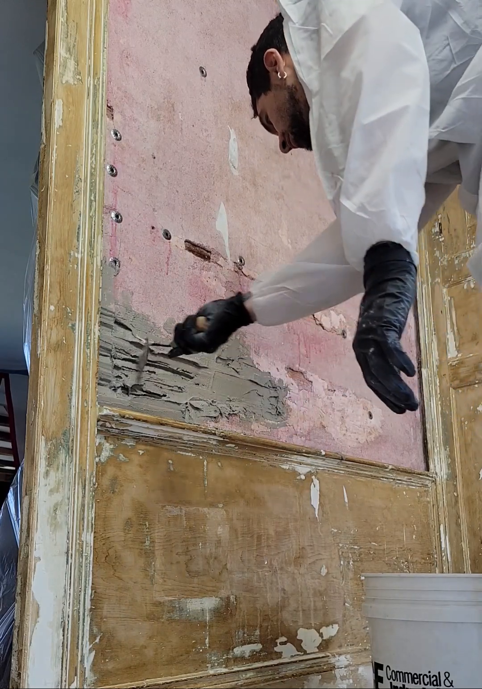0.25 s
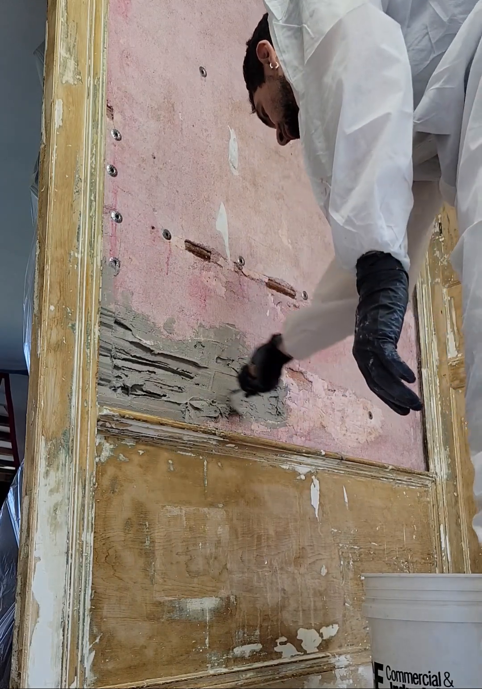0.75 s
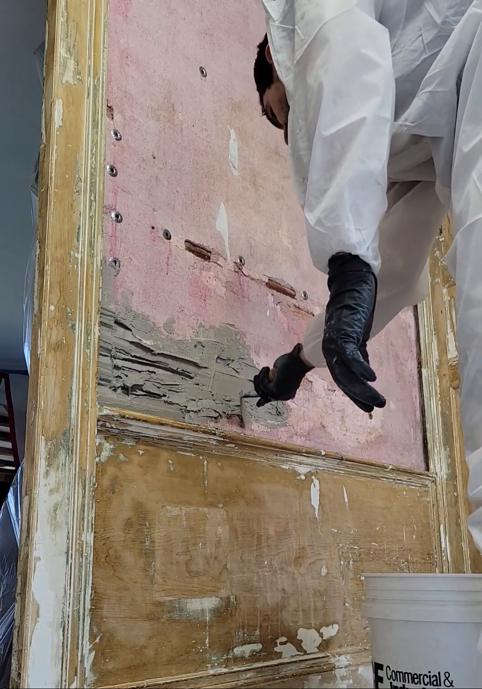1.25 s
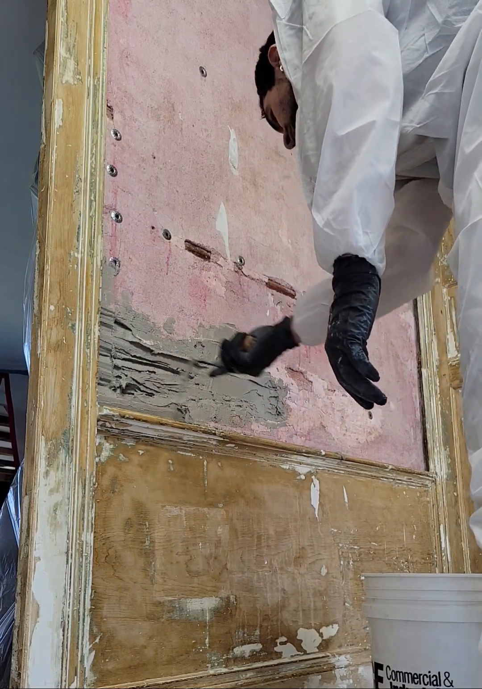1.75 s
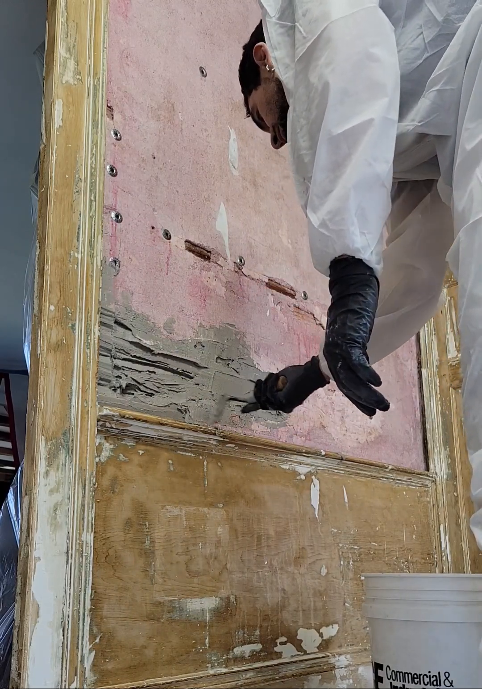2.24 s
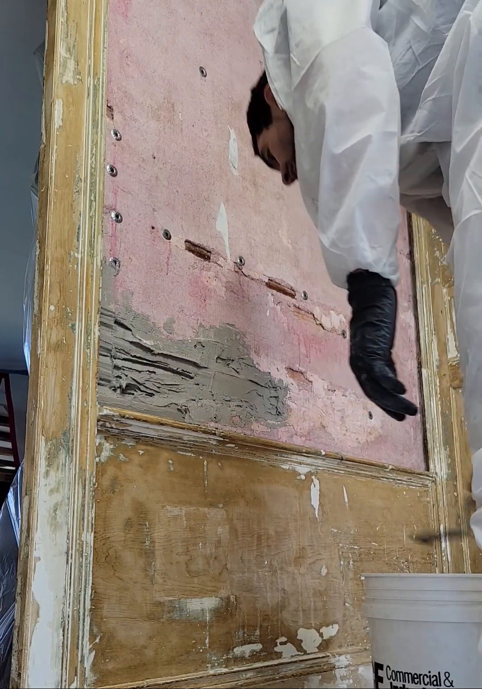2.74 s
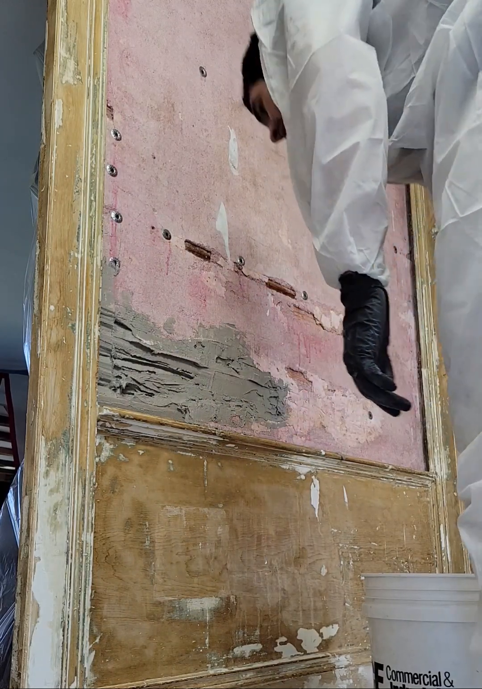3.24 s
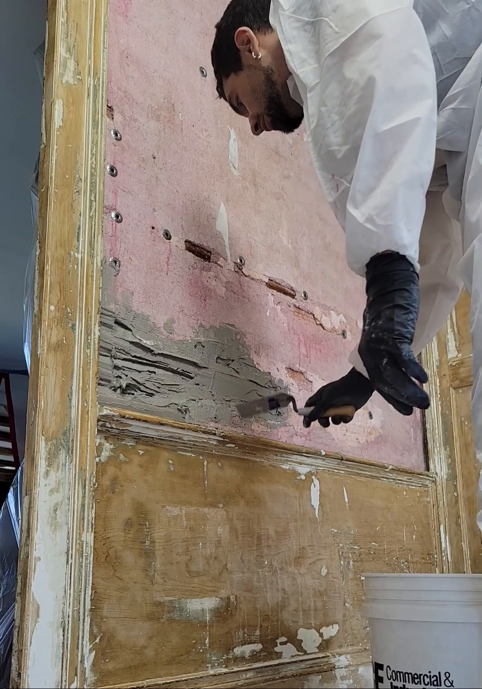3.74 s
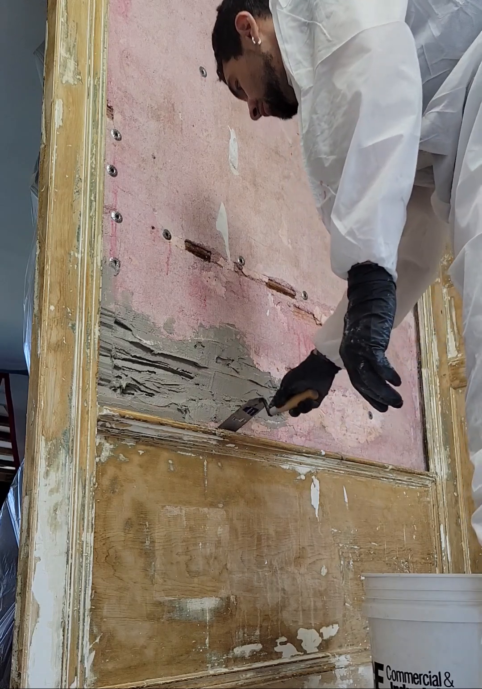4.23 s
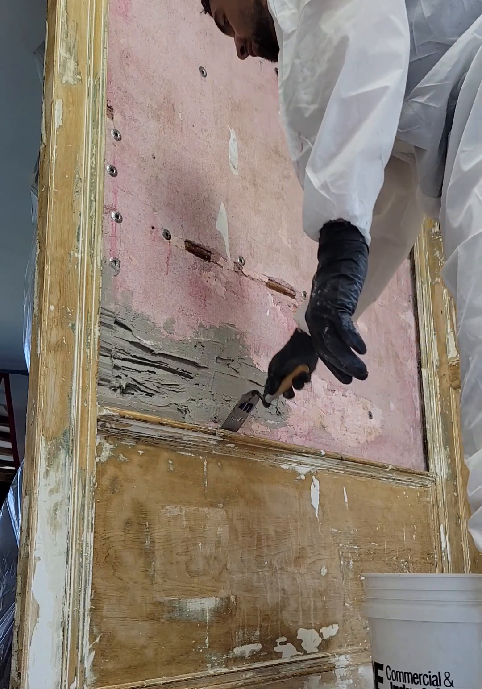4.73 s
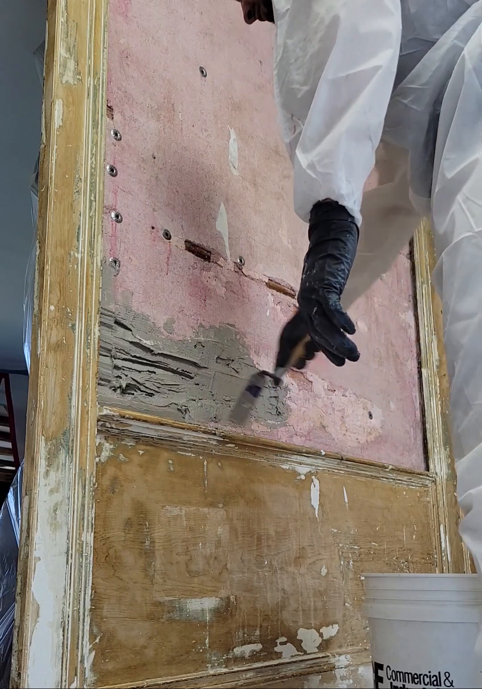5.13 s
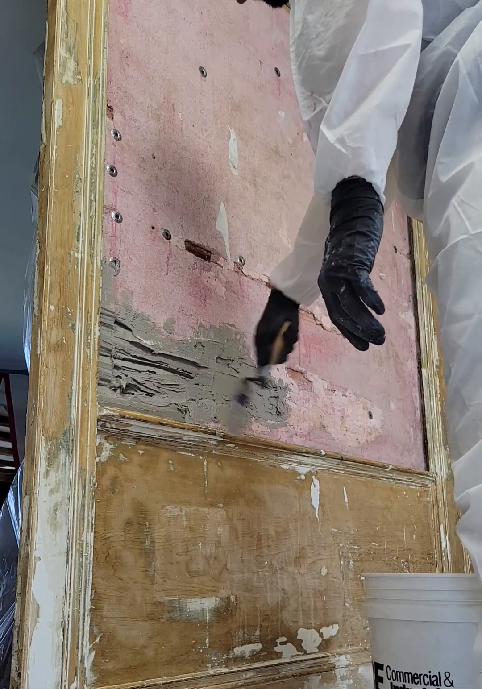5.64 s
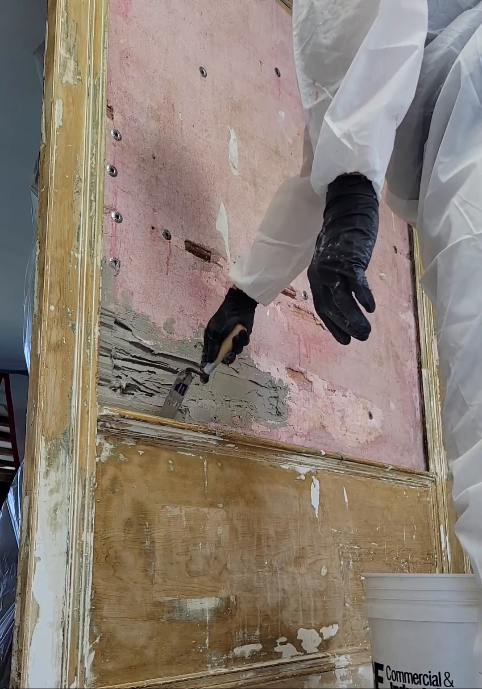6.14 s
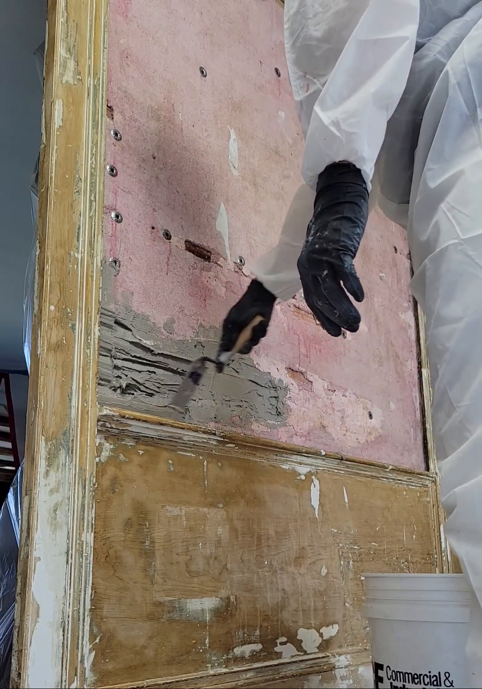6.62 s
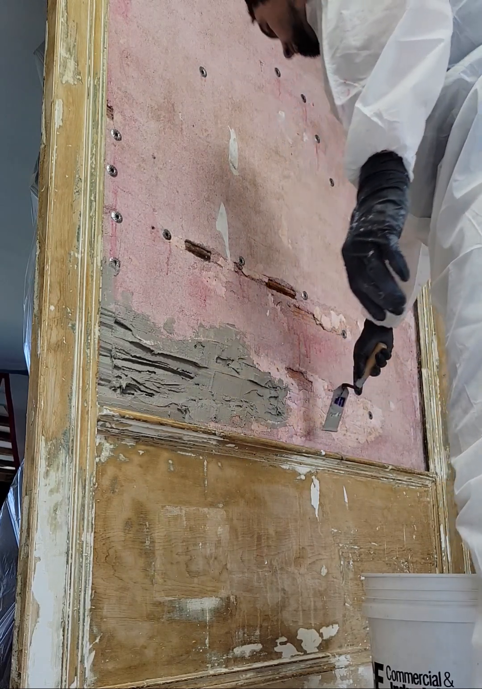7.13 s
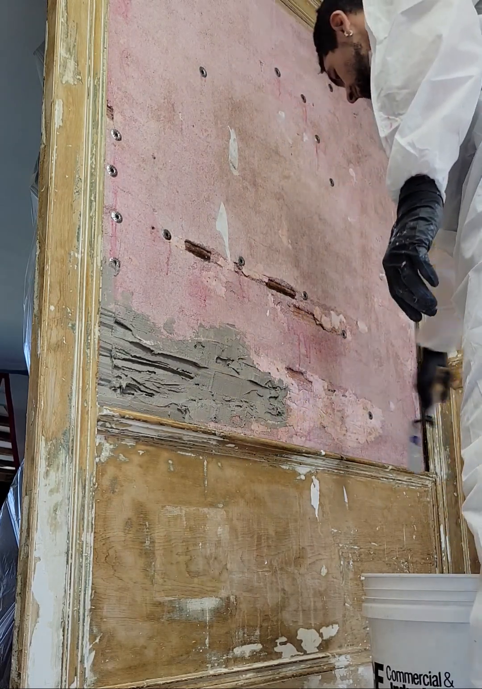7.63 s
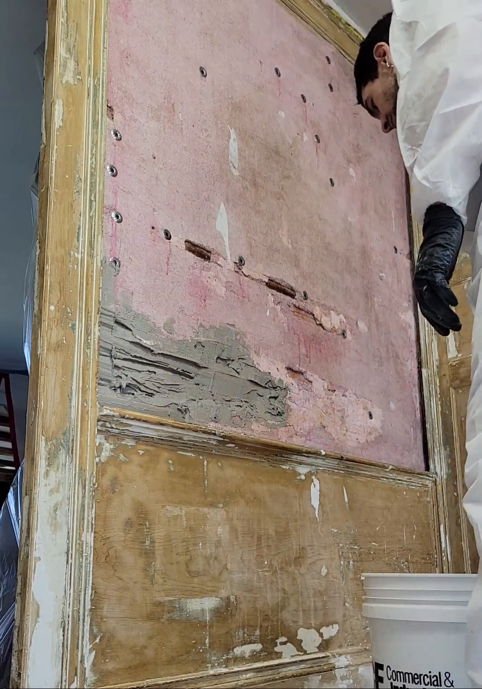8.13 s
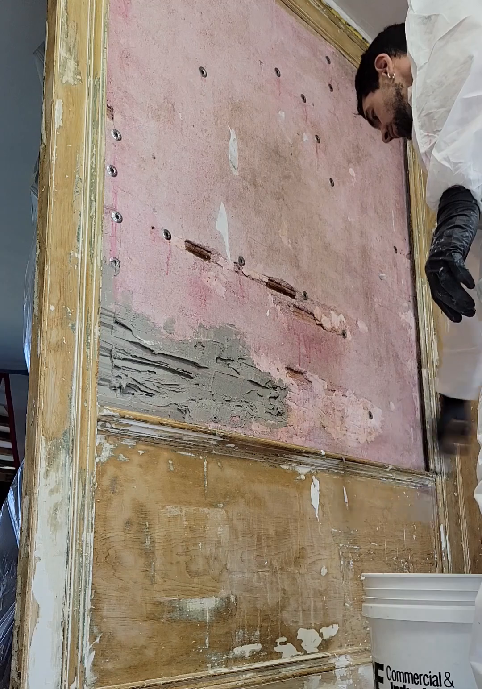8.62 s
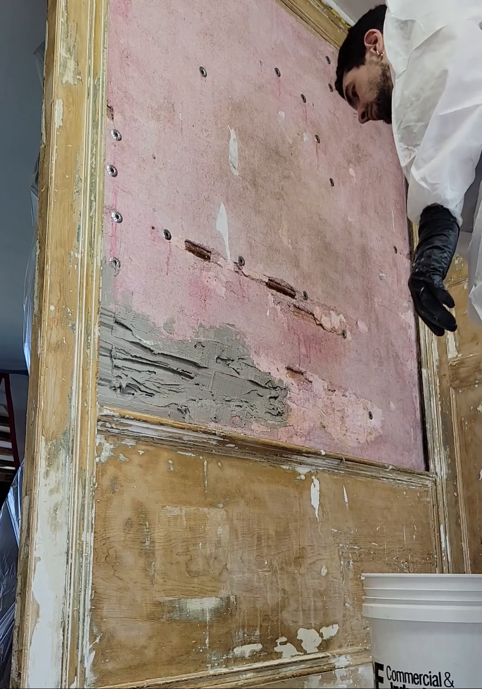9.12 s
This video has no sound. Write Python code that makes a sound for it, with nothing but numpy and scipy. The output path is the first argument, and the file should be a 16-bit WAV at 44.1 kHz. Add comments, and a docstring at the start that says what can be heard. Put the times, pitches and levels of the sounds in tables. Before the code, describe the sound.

Brief sandy trowel scrapes on a plastered wall, broken by dull wooden knocks and faint clothing rustle in an empty room.

```python
"""Plastering over lath

A bare room in an old house, the stereo microphone far enough off to hear more room than direct scrape.
A steel trowel spreads sandy plaster over wooden lath in short strokes: the hand bears down, eases and
lifts, and sand grains catch under the blade, shaking the steel and the hollow wall. The tool knocks as
it lands and is reloaded. Between strokes a coverall rustles, over a faint mains hum."""
import sys
import numpy as np
from scipy import signal
from scipy.fft import rfft, irfft, next_fast_len
from scipy.io import wavfile

SR = 44100
rng = np.random.default_rng(int(sys.argv[2]) if len(sys.argv) > 2 else 0)


def int16_out(signal):
    """Quantize to a 16-bit WAV file."""
    q = np.round(np.clip(np.atleast_2d(signal).T, -1, 1) * 32767)
    wavfile.write(sys.argv[1], SR, q.astype(np.int16))


N = 413216
TIME = np.arange(N) / SR
LIFT_S, FLEX_RELEASE_S = 0.0065, 0.06  # decay times as the blade lifts and as the lath settles

# Strokes of the blade; mortar and hand pressure shift its two bending modes. Levels marked rel are
# relative to the grit: start_s, bear_s, ease_s, peak_grit_db, swell_db, blade_rel_db, wall_rel_db,
# fizz_rel_db, flex_rel_db, low_mode_lift_db, high_mode_hz, high_mode_lift_db
STROKES = [ (0.0, 0.13, 0.13, -35, 9.5, 2.5, -3.5, -15, -25.5, 1, 1540, -2.5),
           (0.673, 0.19, 0.0085, -17, 20.5, 1, -9.5, -15, -40, 4.5, 1481, 1),
           (1.34, 0.057, 0.0092, -44, 6, -1.5, 1, -16, -20, -7, 1530, 1),
           (1.39, 0.11, 0.039, -26.5, 7, 0.5, -9, -15, -28, 1.5, 1482, 3.5),
           (2.255, 0.017, 0.04, -49.5, 0.5, 13, 5, -12.5, -21.5, 16.5, 1330, 4.5),
           (4.858, 0.052, 0.021, -26.5, 14.5, 3.5, -6, -14.5, -14.5, 4.5, 1620, 5),
           (5.589, 0.076, 0.013, -27.5, 17, 4.5, -5.5, -13, -14.5, 8, 1354, 4.5),
           (6.278, 0.13, 0.061, -33, 22.5, 2.5, -6, -11, -14.5, 13.5, 1324, 5.5),
           (6.718, 0.016, 0.059, -51.5, -5.5, 5.5, 6, -16, -5, 7, 1500, -6),
           (6.793, 0.1, 0.018, -30.5, 11.5, 3.5, -9, -12, -21, 9, 1456, 5),
           (7.511, 0.026, 0.065, -34, -1, 4, 2, -14, -13, 4.5, 1380, -6),
           (8.572, 0.032, 0.018, -34.5, 11.5, 1, -1.5, -12, -11.5, 13, 1340, 1.5), ]
# Resonances of the steel blade: pitch_hz, width_hz, lift_db
STEEL_MODES = [(1030, 43, 1), (1566, 18, -4), (1680, 89, 5.5), (2108, 82, 7.5), (2850, 30, 5),
               (3000, 15, 5.5), (3045, 9.5, 3), (3060, 12, 3.5), (4160, 31, 5), (5500, 16, -0.5)]
# Spectrum of lath giving under the hand: frequency_hz, level_db
FLEX_SPECTRUM = [(25, -26), (45, -5), (80, 4.5), (110, -1.5), (170, -17.5), (400, -53.5)]


def amp(db):
    """Decibels to gain."""
    return 10 ** (np.asarray(db) / 20)


def unit_rms(x):
    """Scales to rms 1."""
    return x / np.sqrt(np.mean(x ** 2) + 1e-20)


def curve_at(points, hz):
    """Reads a table on a log-frequency axis."""
    point_hz, value = np.transpose(points)
    return np.interp(np.log(hz + 1), np.log(point_hz + 1), value)


def add(track, start_s, sound):
    """Mixes a sound into a track, in place."""
    part = track[max(round(start_s * SR), 0):][:len(sound)]
    part += sound[:len(part)]


def colour(x, spectrum, peaks=(), size=8192):
    """Causal filter of unit power, from a smooth spectrum lifted by resonances."""
    hz = np.fft.rfftfreq(size, 1 / SR)
    peaks_db = sum(lift / (1 + (2 * (hz - centre) / width) ** 2) for centre, width, lift in peaks)
    gain = unit_rms(amp(curve_at(spectrum, hz) + peaks_db))
    cepstrum = irfft(np.log(gain))
    cepstrum[1:size // 2] *= 2  # fold to minimum phase
    cepstrum[size // 2 + 1:] = 0
    return signal.oaconvolve(x, irfft(np.exp(rfft(cepstrum))))[:N]


def contact(level_db, release_s, press_s=0.0086):
    """Gain along a gesture: presses on, follows the level, then lets go."""
    tail = amp(level_db[-1]) * np.exp(-np.arange(0, 8 * release_s, 1 / SR) / release_s)
    gain = np.concatenate([amp(level_db), tail])
    return gain * (1 - np.exp(-np.arange(len(gain)) / SR / press_s))


def grains(per_s, spread_db, judder_db, judder_hz):
    """Tiny impacts of uneven size, bunched by stick and slip."""
    clicks = rng.standard_normal(N) * (rng.random(N) < per_s / SR)
    sizes_db = spread_db * np.minimum(rng.exponential(1, N), 4)
    lowpass = signal.butter(2, judder_hz, fs=SR, output="sos")
    slips = unit_rms(signal.sosfilt(lowpass, rng.standard_normal(N)))
    return unit_rms(clicks * amp(sizes_db + judder_db * slips))


def burst(decay_s, rise_s=0.0025, size=8192):
    """A crunch of noise that starts fast and dies away."""
    t = np.arange(size) / SR
    return rng.standard_normal(size) * (1 - np.exp(-t / rise_s)) * np.exp(-t / decay_s)


def room_tone(air_db=-70.5, hum_hz=119.5, hum_db=-64.5):
    """Still room air and a mains hum, as mid and side."""
    # Spectrum of the air: frequency_hz, level_db
    air_spectrum = [(25, -20.5), (50, -4.5), (100, 1), (170, -10), (300, -13), (700, -17), (1600, -22.5),
                    (3000, -24.5), (6500, -26.5), (8300, -50.5), (13000, -37), (15500, -47)]
    air = np.array([colour(rng.standard_normal(N), air_spectrum) for _ in range(2)])
    hum = np.sqrt(2) * np.sin(2 * np.pi * hum_hz * TIME)
    return amp(air_db) * air + amp(hum_db) * hum


def room_response(direct_db=-4, early_db=-5, early_t60_s=0.06, build_up_s=0.0067):
    """Paths to the microphone, as mid and side: direct sound, close reflections and the room's tail."""
    # Reverberation of the bare room: frequency_hz, t60_s
    decay_times = [(60, 0.35), (160, 0.35), (420, 0.61), (1100, .55), (2900, 0.48), (7000, 0.41),
                   (14000, 0.28)]
    t = np.arange(SR) / SR
    hz, frame_s, noise = signal.stft(rng.standard_normal((2, SR)), SR, nperseg=256)
    fade = amp(-60 * frame_s / curve_at(decay_times, hz)[:, None])
    tail = signal.istft(noise * fade, SR, nperseg=256)[1][:, :SR]
    tail *= 1 - np.exp(-t / build_up_s)
    echoes = rng.choice([-1, 1], (2, SR)) * (rng.random((2, SR)) < 2500 / SR)  # about 2500 a second
    early = echoes * amp(-60 * t / early_t60_s)
    paths = tail / np.linalg.norm(tail[0]) + amp(early_db) * early / np.linalg.norm(early[0])
    paths[0, 0] += amp(direct_db)
    return paths / np.linalg.norm(paths, axis=1, keepdims=True)


def room(x, places=3, travel_hz=2.3):
    """The reflections keep changing as the hand travels along the wall."""
    mid_side = np.zeros((2, N))
    for place in range(places):
        share = np.sqrt(2 / places) * abs(np.cos(np.pi * (travel_hz * TIME + place / places)))
        mid_side += signal.fftconvolve((x * share)[None], room_response(), axes=1)[:, :N]
    return mid_side


def rustle(trim_db=-1, sag_db=4):
    """Cloth crinkles and wet mortar rubs: each movement starts briskly and slows."""
    # Moves of the arm, and of the trowel in the mortar tub: start_s, length_s, cloth_db, rub_rel_db
    movements = [(2.537, 0.53, -75.5, 3.5), (2.932, 0.23, -49.5, 4), (3.09, 0.15, -51, 0),
                 (3.986, 0.032, -63.5, -4.5), (5.962, 0.074, -56.5, -37), (7.846, 0.083, -55.5, -5),
                 (7.956, 0.024, -43.5, -13), (8.201, 0.11, -54.5, -6.5), (8.342, 0.11, -57.5, -40),
                 (8.73, 0.11, -49, -32), (8.96, 0.23, -70.5, 1.5), (9.163, 0.16, -62.5, -9)]
    # Spectrum of the coverall: frequency_hz, level_db
    cloth_spectrum = [(100, -3), (300, -2.5), (700, -5.5), (1500, -4.5), (3000, 1.5), (6500, -2.5),
                      (8300, -23.5), (13000, -19), (16000, -23.5)]
    # Spectrum of steel drawn through wet mortar: frequency_hz, level_db
    rub_spectrum = [(200, -13.5), (600, -3), (1100, -3), (1600, -4), (2300, -4.5), (5000, -33)]
    cloth, rub = np.zeros((2, N))
    for start_s, length_s, cloth_db, rub_rel_db in movements:
        slowing_db = np.linspace(0, sag_db, round(length_s * SR))
        motion = contact(cloth_db + trim_db - slowing_db, release_s=0.073, press_s=0.014)
        add(cloth, start_s, motion)
        add(rub, start_s, amp(rub_rel_db) * motion)
    crinkle = grains(per_s=3600, spread_db=3, judder_db=1.5, judder_hz=51.36)
    return colour(cloth * crinkle, cloth_spectrum) + colour(rub * crinkle, rub_spectrum)


def knocks(ring_db=-6, push_db=-1, reach_octaves=0.97, rise_s=0.0066):
    """Each blow is a low push that rings the wood modes near its pitch and rattles and flexes the lath."""
    # Dull blows of the trowel on wood and mortar:
    # start_s, level_db, pitch_hz, clatter_rel_db, clatter_decay_s, flex_rel_db
    blows = [ (2.29, -42, 720, 6, 0.012, -28), (2.852, -12, 235, -13.5, 0.048, -14),
             (3.123, -28.5, 267, -1.5, 0.041, -10.5), (3.145, -17.5, 113.4, -17, 0.026, -13),
             (4.217, -41, 388, -18, 0.0061, -37), (4.456, -26, 269, -7, 0.037, -11),
             (5.431, -33.5, 310, -9, 0.018, -23.5), (6.186, -54.5, 150, -17, .008, -13),
             (6.773, -38, 325, -1.5, .012, -9), (7.432, -29, 342, -4, 0.018, -21),
             (7.463, -25.5, 341, 4, 0.0078, -40), (8.546, -40, 267, -10, 0.018, -9),
             (9.217, -55.5, 280, 17, .004, -1), ]
    # Modes of the hollow woodwork: pitch_hz, level_db, t60_s
    wood_modes = [(83.1, -9.5, 0.4), (111.2, -7.5, 0.063), (154, -6, 0.25), (182.8, -0.5, 0.24),
                  (226, 3, 0.15), (267.1, 1, 0.21), (326, -1.5, 0.27), (378, -2.5, 0.16), (481, -4, 0.19),
                  (673, -6.5, .07)]
    # Spectrum of loose lath rattling: frequency_hz, level_db
    clatter_spectrum = [(25, -46), (50, -22), (90, -9), (180, -12.5), (300, 6), (700, 0.5), (1400, -5.5),
                        (2500, -13), (6000, -51.5)]
    t = np.arange(SR // 2) / SR
    mode_hz, mode_db, t60_s = np.transpose(wood_modes)[:, :, None]
    envelopes = amp(mode_db - 60 * t / t60_s) * (1 - np.exp(-t / rise_s))
    modes = envelopes * np.sin(2 * np.pi * mode_hz * t)
    thud, clatter, flex = np.zeros((3, N))
    for start_s, level_db, pitch_hz, clatter_rel_db, clatter_decay_s, flex_rel_db in blows:
        reach = 1 / (1 + (np.log2(mode_hz / pitch_hz) / reach_octaves) ** 4)
        ring = amp(ring_db) * (reach * modes).sum(0)
        cycles = pitch_hz * t
        push = amp(push_db) * cycles * np.exp(1 - cycles) * np.sin(2 * np.pi * cycles)
        add(thud, start_s, amp(level_db) * (push + ring))
        add(clatter, start_s, amp(level_db + clatter_rel_db) * burst(clatter_decay_s))
        add(flex, start_s, amp(level_db + flex_rel_db) * burst(FLEX_RELEASE_S))
    return thud + colour(clatter, clatter_spectrum) + colour(flex, FLEX_SPECTRUM)


def blade_ring(pitch_hz=2960, width_hz=140, decay_s=0.054):
    """Off the wall, the steel's strongest cluster of modes dies away with a rough, beating ring."""
    # The blade springs clear of the mortar: start_s, level_db
    releases = [(0.879, -37), (4.445, -52), (4.919, -41.5), (8.604, -53)]
    drive = np.zeros(N)
    for start_s, level_db in releases:
        add(drive, start_s, amp(level_db) * burst(decay_s, size=SR // 2))
    b, a = signal.iirpeak(pitch_hz, pitch_hz / width_hz, fs=SR)
    make_up_gain = np.sqrt(SR / width_hz / 2)
    return make_up_gain * signal.lfilter(b, a, signal.lfilter(b, a, drive))


def blade_rasp(drive, low_db, high_hz, high_db, low_hz=740, width_hz=280, reference_hz=1600):
    """The blade rasps through two broad bending modes; load lowers the upper one and the whole colour."""
    # Spectrum of the blade with its upper mode at reference_hz: frequency_hz, level_db
    blade_spectrum = [(200, -24), (450, 3), (700, -1.5), (1100, 0), (1600, 6), (2100, 6), (3000, -11.5),
                      (6000, -39)]
    shifted = np.array(blade_spectrum) * [high_hz / reference_hz, 1]
    bending_modes = [(low_hz, width_hz, low_db), (high_hz, width_hz, high_db)]
    return colour(drive, shifted, list(STEEL_MODES) + bending_modes)


def blade_bending(drive):
    """Each stroke loads the blade in its own way; between strokes it is free."""
    loaded, free = np.zeros(N), drive.copy()
    for start_s, bear_s, ease_s, *_, low_db, high_hz, high_db in STROKES:
        end_s = start_s + bear_s + ease_s + 2 * LIFT_S
        span = slice(round(start_s * SR), round(end_s * SR))
        add(loaded, start_s, blade_rasp(drive[span], low_db, high_hz, high_db))
        free[span] = 0
    return loaded + blade_rasp(free, low_db=2, high_hz=1420, high_db=4)


def hand_pressure(bear_s, ease_s, swell_db, ease_db=9):
    """Force through one stroke, in dB from its peak: the hand bears down, then eases off."""
    t = np.arange(0, bear_s + ease_s, 1 / SR)
    bearing = np.maximum(1 - t / bear_s, 0) ** 1.21  # fast at first, flattening towards the peak
    easing = np.maximum(t - bear_s, 0) / ease_s
    return -swell_db * bearing - ease_db * easing


def trowel_scrape(stroke_trim_db=-2, snag_trim_db=3, wall_follow=0.61, fizz_follow=1.2, flex_follow=0.7):
    """One stream of sand impacts hisses, rings the blade, drums on the wall and shakes the lath."""
    # The edge touches down or snags on a coarse grain: start_s, grit_db, blade_rel_db, fizz_rel_db
    snags = [ (0.076, -17.5, -25, -19.5), (0.124, -22, -19, -34), (0.165, -21, -15.5, -42),
             (0.6728, -31, 1.5, -36), (0.8753, -8, -19.5, -30.5), (1.2942, -50, 7, -41),
             (1.4, -15.5, -8.5, -18), (2.8496, -20.5, -0.5, -35), (3.1199, -20.5, 1, -20),
             (4.2072, -55, -2, -13.5), (4.4456, -25.5, -2.5, -13), (4.6624, -50, 3.5, -10.5),
             (4.9132, -17, -18, -30), (5.4351, -50.5, 3, -23), (5.588, -36, 7, -14),
             (5.6227, -29, -11, -24), (5.6475, -28, 4, -22), (5.66, -18, 2, -12), (5.973, -43, -4.5, -4.5),
             (6.1791, -39, -2, -20), (6.3683, -23.5, 2, -14), (6.3914, -26.5, 8.5, -8),
             (6.4445, -33, 1, -5), (6.825, -24.5, -6, -12), (6.87, -21, 3, -11), (7.4618, -30, 9, -29),
             (7.5664, -20.5, -26, -32), (7.868, -45, -4, -26), (8.4157, -41.5, -13, -13),
             (8.604, -25, -3.5, -15), (8.7026, -37.5, -3.5, -12), (9.219, -50.5, 8.5, -28), ]
    # Spectrum of sand under the steel: frequency_hz, level_db
    grit_spectrum = [(500, -29.5), (1600, 1), (2600, 6.5), (4000, 0.5), (5500, -1.5), (6700, -7),
                     (7500, -20), (8400, -24), (16000, -38.5)]
    # Spectrum of the hollow wall: frequency_hz, level_db
    wall_spectrum = [(25, -39.5), (50, -26.5), (90, -24), (130, -8.5), (180, 6.5), (320, 8), (480, 5.5),
                     (700, -21), (2000, -51.5)]
    # Spectrum of the bare edge fizzing: frequency_hz, level_db
    fizz_spectrum = [(3000, -46), (7000, 4.5), (8500, -2.5), (10500, 3), (13000, 6), (15500, 3.5)]
    drives = np.zeros((5, N))
    grit_drive, blade_drive, wall_drive, fizz_drive, flex_drive = drives
    for start_s, bear_s, ease_s, peak_db, swell_db, blade_rel, wall_rel, fizz_rel, flex_rel, *_ in STROKES:
        level_db = peak_db + stroke_trim_db
        force_db = hand_pressure(bear_s, ease_s, swell_db)
        freeing_db = np.linspace(-0.25, 0.25, len(force_db))  # the blade rings more as mortar runs out
        add(grit_drive, start_s, contact(level_db + force_db, LIFT_S))
        add(blade_drive, start_s, contact(level_db + blade_rel + force_db + freeing_db, LIFT_S))
        add(wall_drive, start_s, contact(level_db + wall_rel + wall_follow * force_db, LIFT_S))
        add(fizz_drive, start_s, contact(level_db + fizz_rel + fizz_follow * force_db, LIFT_S))
        add(flex_drive, start_s, contact(level_db + flex_rel + flex_follow * force_db, FLEX_RELEASE_S))
    grit, blade, wall, fizz, flex = drives * grains(per_s=6500, spread_db=3, judder_db=5, judder_hz=170)
    coarse = grains(per_s=440, spread_db=1.5, judder_db=1.5, judder_hz=60)  # the few large grains crackle
    grit += amp(-10) * grit_drive * coarse
    fizz += amp(-6) * fizz_drive * coarse
    for start_s, grit_db, blade_rel, fizz_rel in snags:
        crunch = amp(grit_db + snag_trim_db) * burst(decay_s=0.004)
        add(grit, start_s, crunch)
        add(blade, start_s, amp(blade_rel) * crunch)
        add(fizz, start_s, amp(fizz_rel) * crunch)
    from_tool = colour(grit, grit_spectrum, STEEL_MODES) + blade_bending(blade) + colour(fizz, fizz_spectrum)
    return from_tool + colour(wall, wall_spectrum) + colour(flex, FLEX_SPECTRUM)


def scene(thud_direct_db=-5, thud_room_db=-2):
    """One room from one microphone position; the bass is near mono and the midrange wide."""
    # Stereo width: frequency_hz, side_minus_mid_db
    stereo_width = [(60, -13), (150, -14), (300, -2.5), (600, 2), (1300, 5), (2600, -0.5), (6000, 0.5),
                    (14000, 1)]
    # Stereo balance: frequency_hz, left_minus_right_db
    balance = [(100, -2.5), (400, 0), (1400, -0.63), (2800, 0.5), (5500, -4), (9500, 6), (14000, -3)]
    thuds = knocks()
    work = trowel_scrape() + blade_ring() + rustle() + amp(thud_room_db) * thuds
    mid_side = room(work) + room_tone()
    mid_side[0] += amp(thud_direct_db) * thuds  # the woodwork radiates straight at the microphone
    size = next_fast_len(N + SR, True)
    hz = np.fft.rfftfreq(size, 1 / SR)
    mid, side = rfft(mid_side, size)
    side *= amp(curve_at(stereo_width, hz))
    lean = amp(curve_at(balance, hz) / 2)
    left, right = (mid + side) * lean, (mid - side) / lean
    return irfft(np.array([left, right]), size)[:, :N]


def record(dry, low_cut_hz=56, high_cut_hz=15900):
    """The microphone sheds the deepest bass, and a steep filter cuts the highest treble."""
    highpass = signal.butter(3, low_cut_hz, "highpass", fs=SR, output="sos")
    lowpass = signal.firwin(511, high_cut_hz, window=("kaiser", 9), fs=SR)
    return signal.oaconvolve(signal.sosfilt(highpass, dry), lowpass[None], "same", axes=1)


dry = scene()
out = record(dry)
int16_out(out)
```